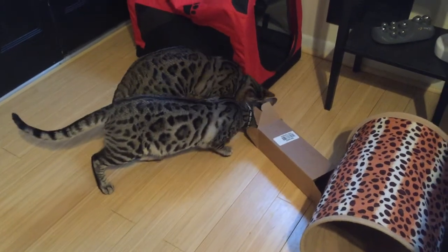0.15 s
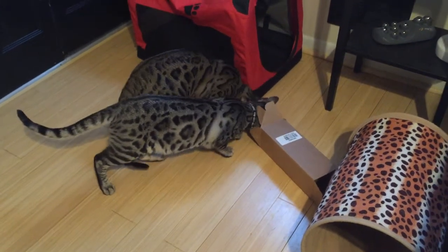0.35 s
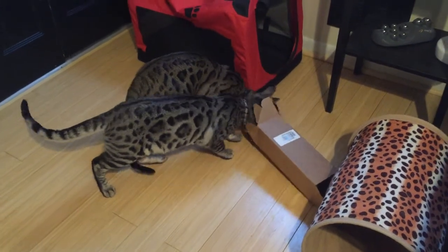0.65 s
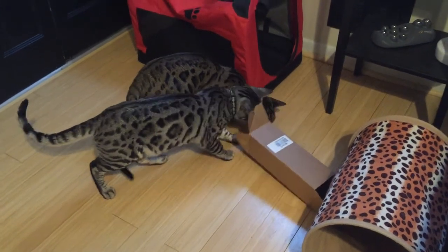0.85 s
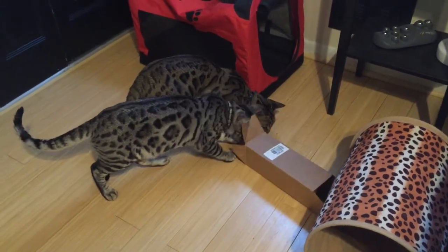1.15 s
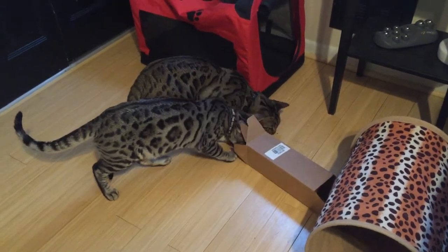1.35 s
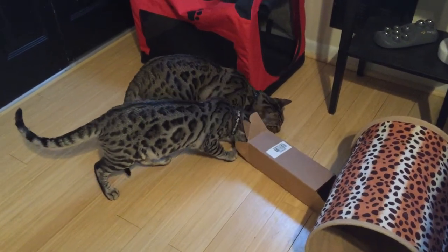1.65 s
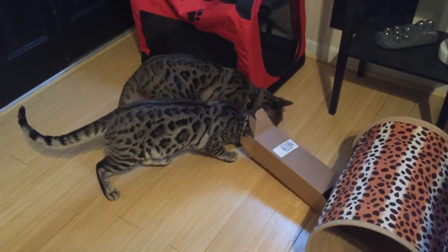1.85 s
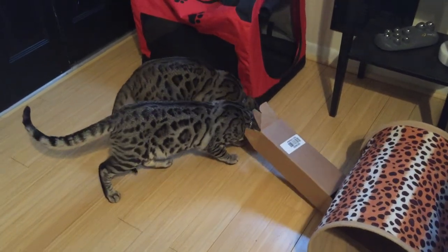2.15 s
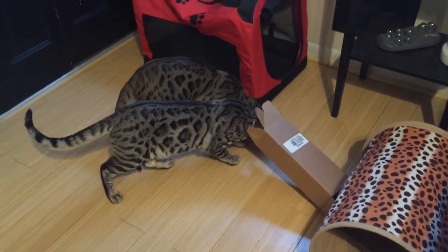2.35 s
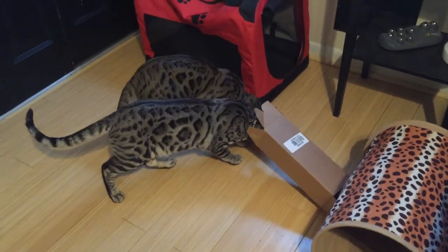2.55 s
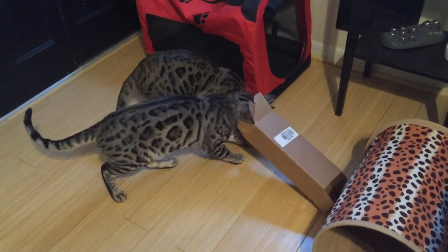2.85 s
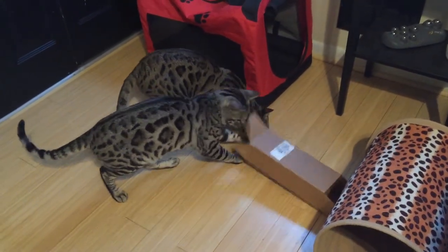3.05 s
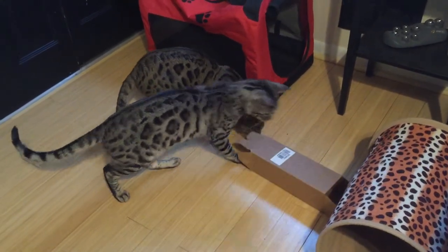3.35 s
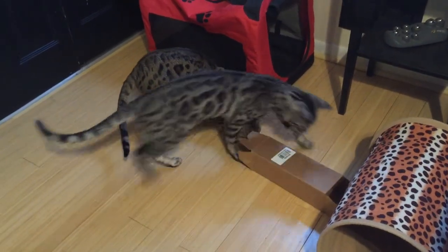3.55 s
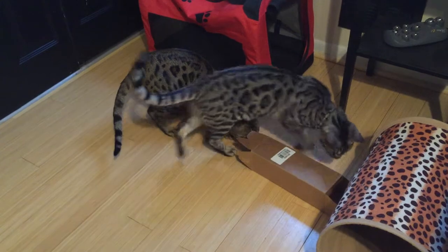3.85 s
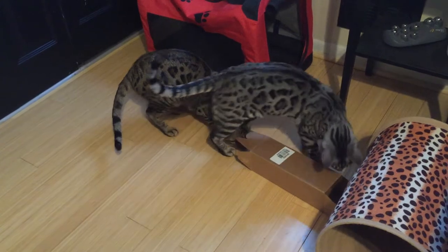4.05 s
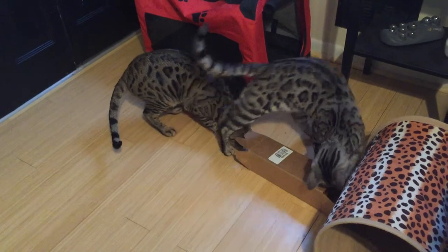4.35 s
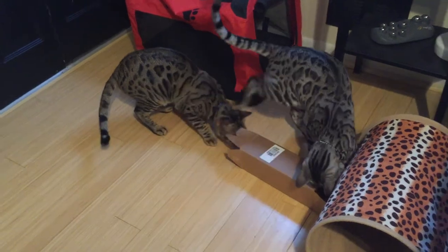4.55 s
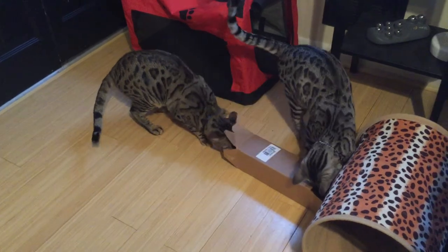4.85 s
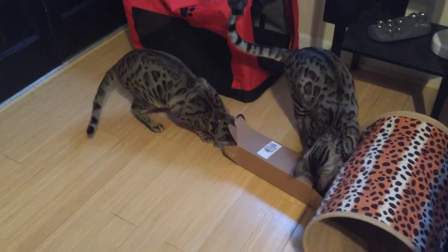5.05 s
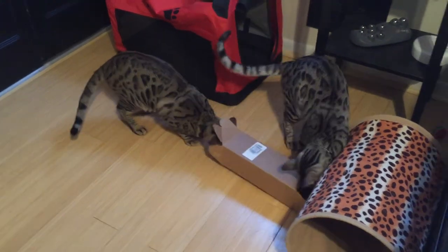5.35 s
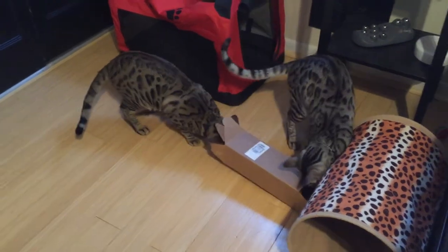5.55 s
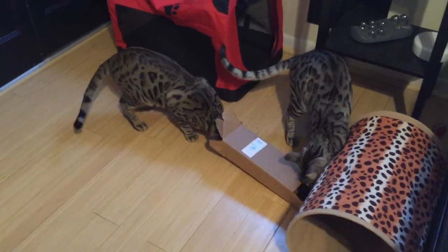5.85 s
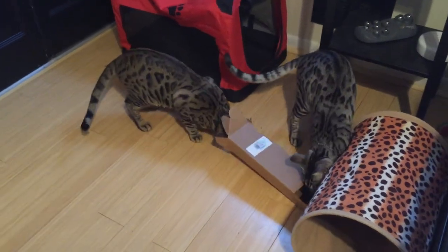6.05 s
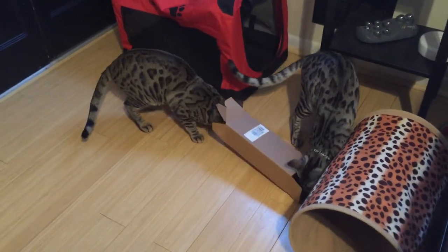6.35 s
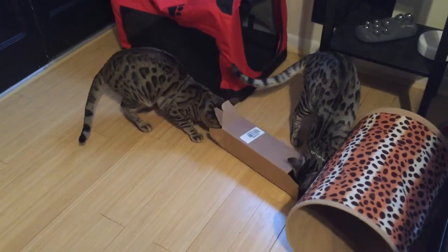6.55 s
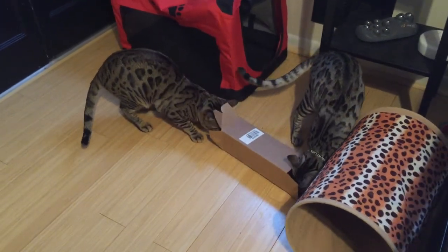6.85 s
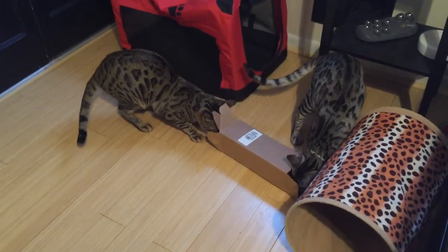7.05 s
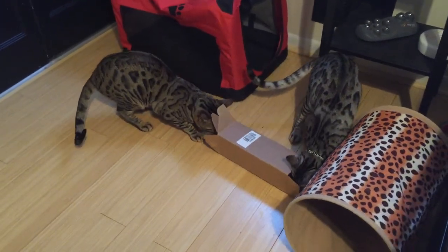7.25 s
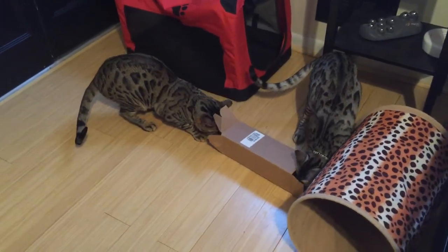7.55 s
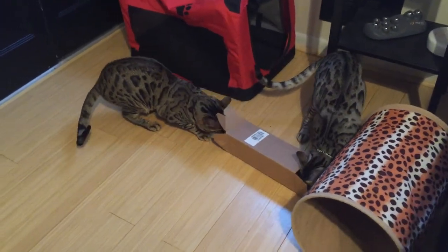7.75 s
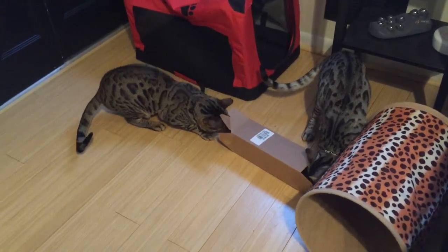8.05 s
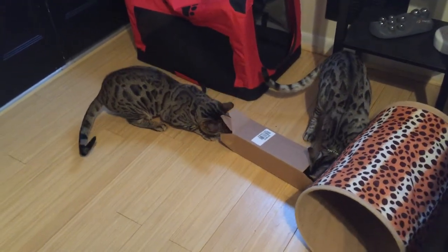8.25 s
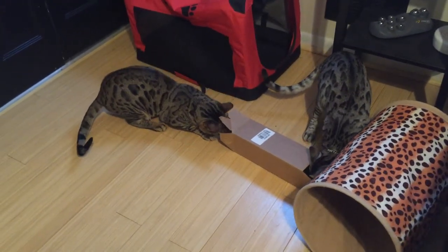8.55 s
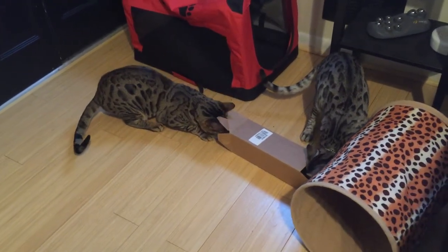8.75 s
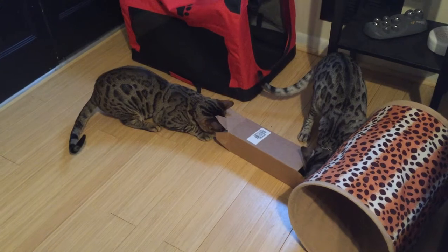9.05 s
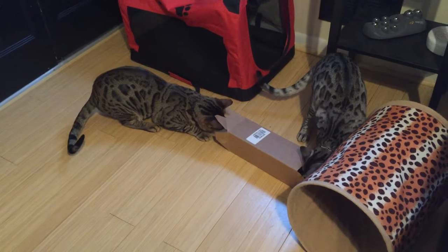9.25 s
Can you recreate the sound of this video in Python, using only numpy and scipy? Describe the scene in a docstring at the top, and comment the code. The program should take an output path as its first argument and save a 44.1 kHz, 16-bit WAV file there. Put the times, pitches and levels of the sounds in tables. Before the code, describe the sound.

In a quiet small room, a light cardboard box is pushed juddering over boards, slaps down hard, then gets knocked, scraped and crunched by paws.

```python
"""Fur brushes card and rustles faintly at first, over a faint hum and hiss, then a paw taps: two cats
paw and nose a small cardboard box on the wooden floor of a small room, which rings briefly after them.
The pushed edge judders over the boards, then the box drops flat with a sharp knock; later it scrapes
and crunches. Blows excite damped panel modes, rubs are grains of friction noise, squeaks are wavering
tones, steps are dying low tones, and the microphone channel passes nothing above its band limit."""
import sys
import numpy as np
from scipy import signal
from scipy.fft import rfft, irfft, next_fast_len
from scipy.io import wavfile
from scipy.ndimage import map_coordinates

SR = 44100
rng = np.random.default_rng(int(sys.argv[2]) if len(sys.argv) > 2 else 0)


def store_pcm(level_fs):
    """Save levels as 16-bit WAV."""
    pcm = np.round(np.clip(level_fs, -1, 1) * 32767).astype(np.int16)
    wavfile.write(sys.argv[1], SR, np.atleast_2d(pcm).T)


N = 414099
LENGTH = 32768  # samples in one blow or response
T = np.arange(LENGTH) / SR
HZ = np.fft.rfftfreq(LENGTH, 1 / SR)

# Every touch is described in four ranges: thud, knock, tap and tick. Knock sets the touch's level;
# thud, tap and tick are offsets from an ordinary touch of its kind.
# the four ranges, the lowest left open downwards: (low f/Hz, high f/Hz)
RANGES = [(110, 450), (450, 1500), (1500, 3200), (3200, 17000)]

# fur and flaps rub on the card, with a soft tap at 8.231 s:
# (start t/s, length t/s, knock level/dB, thud/dB, brightness/dB)
BRUSHES = [(0.018, 0.064, -75, 7, 3), (0.14, 0.43, -84, 6.5, 7), (0.65, 0.035, -75, 8.5, 0),
           (0.693, 0.12, -56, 4, -10.5), (1.892, 0.029, -53.5, -15, -6.5), (2.127, 0.44, -79, -12, 10.5),
           (2.316, 0.0097, -75.5, -11, 18), (2.692, 0.33, -75.5, -7, 17.5), (3.174, 0.14, -59, 9, 12),
           (3.45, 0.012, -61, -16, -5), (4.56, 0.18, -67.5, -14, 1.5), (5.956, 0.084, -66, 1, 4.5),
           (8.231, 0.0091, -64.5, -4, -19), (9.063, 0.018, -67, -13, -2.5)]
# a loose flap scuffs the box with a thin rasp: (start t/s, length t/s, knock level/dB)
SCUFFS = [(4.693, .012, -72), (8.749, 0.0065, -69.5), (9.217, 0.0064, -59), (9.38, .03, -73)]
# a faint thin rustle, as of fur on fabric: (start t/s, length t/s, knock level/dB)
RUSTLES = [(0.02, 0.073, -72), (0.152, 0.14, -82), (0.339, 0.056, -76)]
# paws and teeth on the box: (t/s, knock level/dB, thud/dB, tap/dB, tick/dB, panel f/Hz, panel ring/dB)
PAW_KNOCKS = [(0.076, -69.5, 12, 6, 16, 1090.0, -5), (1.146, -67, 12, -5, -2.5, 253, 1),
              (1.201, -46, 1, -7.5, -5.5, 810, -9), (1.222, -47, 2, -7, -5.5, 1350, -3),
              (2.09, -72.5, -5, 8.5, 19, 1530, -15), (3.214, -43.5, 3, -15, -8, 280, 4),
              (3.315, -39.5, 2, 1, -1.5, 953, -4), (3.331, -38.5, -15, -3, 0, 944, -0.5),
              (3.448, -53.5, -10, -5.5, -10.0, 1112, -3), (3.527, -68.5, -13.5, -6, -15, 1004, -1.5),
              (3.739, -44, -1.0, -10, -9, 571, -2.5), (4.539, -59.5, 7, -11, -22.5, 449, -0.5),
              (4.553, -57.5, 6, -4.5, -4, 235.0, 4), (4.586, -70, 7.5, -1.0, -5.0, 260.0, 1),
              (4.692, -63.5, 4, -2.0, 2, 1146, -9), (4.768, -64, -9.5, 7.5, 10.5, 1170, -5),
              (5.817, -75.5, 4.5, 13.5, 25.5, 2100.0, -10), (5.835, -47.5, -8.5, -12, -5, 1090, -6),
              (5.995, -50.5, -1.5, -2.5, -1, 887, 7), (6.031, -57.5, -8, 5.5, 10, 2150, -11.0),
              (6.094, -48, -5.5, 6.5, 13, 960, 0.0), (6.109, -51.5, -11, 5.5, -9, 1650.0, -2),
              (6.158, -44.0, -3.5, 4, 8.5, 950, -8), (6.741, -60.5, -9.5, -5, -9.5, 820.0, -5.5),
              (7.012, -71, -12, -9.5, -10.5, 1112, -3), (7.122, -49, 4, -7.5, -10, 366, -7.5),
              (7.151, -53, -3, -7.5, -13, 295.0, 3.0), (7.177, -61, 10.5, -10, -16.5, 786, 2.0),
              (7.262, -62, 1, -9, -5, 638, -9), (7.352, -64.5, -2, -8.5, -5, 820, -7.5),
              (7.496, -50, 1.0, -5.5, -4.5, 559, -9), (7.592, -55.5, -6, -7, -2.5, 1124, 7),
              (7.621, -52.5, -15, -10.0, -3, 644, 2), (7.646, -46, -16.5, -5.5, -2, 1077, 5),
              (7.672, -47.5, -10.5, -3, -0.5, 1280, 0), (7.799, -58.5, -9, 2, 9, 1140, 8.0),
              (7.843, -37, -14, -4.5, -2, 1067, 4.5), (7.867, -44, -19, -21, -14, 843, -4),
              (7.883, -66.0, -14, 1, 16, 1220.0, -8.0), (7.972, -50.5, -8, -10, -9, 656, -6.0),
              (7.983, -46.5, -11, -7, -9.5, 906, -7), (8.033, -44.0, -6, 6, 13, 2513, 0),
              (8.147, -57.5, -16, -19, -27.0, 670, 3), (8.2, -59.5, -7, -13, -17, 650, -3),
              (8.327, -47, -2.5, -11, -10.5, 642, -4.5), (8.352, -72, 4.5, 12.5, 20.5, 230.0, -9),
              (8.409, -63, 6, -19, -16.0, 640, -8), (8.447, -56, -3, -17, 4.5, 1390, -12),
              (8.489, -58.5, -9, -9, 11, 1400.0, -8.0), (8.525, -63.0, -14, 12.5, 25, 1420, -1.0),
              (8.625, -66.5, -14, 18.5, 33.5, 2400.0, 7), (8.74, -51, -3.5, -0.5, -18, 2320, 4),
              (8.877, -60.5, -4.5, 1.5, -2.5, 2130, 5), (8.925, -64, 3, -10.5, -9.5, 621, 0.5),
              (9.058, -62.0, -11.5, -2, -6.5, 1300, 5.5), (9.173, -62.5, -9.5, 8, 13, 1970, -13),
              (9.203, -54.0, -13.5, 3.5, -1.5, 1384, 1.5)]
# soft steps on the boards: (t/s, level/dB, pitch f/Hz)
STEPS = [(1.991, -50, 54), (3.689, -50.5, 216), (3.811, -48, 65.3), (5.365, -44, 201.5),
         (5.553, -54.5, 212), (5.919, -46.5, 160), (7.51, -42, 141)]
# a claw tip clicks on the boards: (t/s, level/dB)
CLAW_CLICKS = [(2.302, -66.5), (2.316, -60), (2.942, -52), (5.314, -69.5), (5.393, -68), (5.459, -67),
               (5.77, -70), (6.0784, -52), (6.358, -60.5), (6.416, -60), (6.432, -57), (6.478, -60)]
# card slipping on card: (t/s, length t/s, level before the swell/dB, pitch f/Hz)
SQUEAKS = [(2.41, 0.05, -65, 690), (4.695, 0.016, -52, 1150), (6.092, 0.038, -40, 930),
           (6.14, 0.049, -47, 920), (6.465, 0.082, -62.5, 407), (7.585, 0.02, -52, 1163),
           (7.654, 0.047, -54, 1225), (7.747, 0.029, -60, 1085)]
# the pushed edge sticks and slips: (t/s, knock level/dB, tap/dB, tick/dB, panel f/Hz, panel ring/dB)
EDGE_SLIPS = [(2.459, -48, -18, -18, 820.0, -8), (2.485, -41, -6, -13, 1075.0, -18),
              (2.492, -42.5, -10, -7.5, 646.0, 1.0), (2.567, -39, -4.5, -1, 1100.0, -11),
              (2.581, -35, 1, 1.5, 650.0, -3), (2.655, -33, -7.5, -3, 651.0, -3.5),
              (2.7, -36, -4.5, -1, 1359.0, -1), (2.727, -42.0, -3, -5.0, 985.0, -5.5),
              (2.774, -35.5, -9, -9, 1120.0, -4.5), (2.785, -37.5, -14, -17.5, 639.0, 1.5),
              (2.811, -39, -2, 0.5, 1400.0, -4), (2.827, -41, -2.5, -6, 1310.0, -5.5),
              (2.848, -45, -3.5, -7.5, 1310.0, -2.5), (2.875, -42.5, 1, -3, 1110.0, -1.5),
              (2.885, -35.5, 1.5, -1.5, 1348.0, 3.5), (2.911, -46, -2.0, -7, 1379.0, -3.5),
              (2.934, -38, -2.0, -1, 1386.0, -3), (2.949, -32.0, 0.5, 1, 1100.0, -3.0),
              (2.959, -37, 1, -2.5, 1360.0, 0.0), (3.01, -37.5, -1, -4.5, 1355.0, -3.5),
              (3.035, -38, -5.5, -13, 994.0, -5), (3.081, -32.5, 1.5, 5.5, 1360.0, -10.5),
              (3.106, -42, 1.5, 3.5, 580.0, -3.5), (3.116, -40.5, -1, -2, 1096.0, 3),
              (3.152, -37.5, -3.5, -1.5, 740.0, -6.5), (3.179, -43, -9.5, -6.5, 1095.0, -4.0)]
# the edge grinds over the floor: (start t/s, length t/s, knock level/dB)
EDGE_GRIND = [(2.487, .71, -51)]
# the lifted box falls flat: (t/s, knock level/dB, thud/dB, tap/dB, tick/dB, panel f/Hz, panel ring/dB)
FALL = [(3.2272, -19.5, -5, -4.5, -3, 965.6, -4)]
# the box slides along the floor, or crunches briefly (the short middle curve);
# one curve per scrape or crunch: (t/s, knock level/dB, thud/dB, brightness/dB)
SCRAPE_CURVES = [
    [(6.16, -72, -10, -0.5), (6.2, -51.5, -7, -1), (6.26, -48.5, -0.5, -3), (6.32, -50.5, -10, -1),
     (6.35, -51.5, -16, 3.5), (6.385, -56.5, -7, 9), (6.44, -61, -9, 16), (6.49, -63, -11, 17.5),
     (6.56, -69.5, -6.5, 13), (6.72, -81, -5.5, 2)],
    [(8.034, -54, 1, 1), (8.045, -46.5, -1, 10), (8.06, -48.5, -6, 18.5), (8.08, -54, -13, 11),
     (8.12, -67, -17, 12), (8.2, -84, -11, 14)],
    [(8.39, -79, 3, 16), (8.45, -72, -9, 10), (8.505, -60, 4, 12), (8.535, -52.5, -10, 10),
     (8.6, -50.5, -16, 12.5), (8.65, -52.5, -4, 11), (8.7, -60, 3, -1), (8.8, -67, -17, -11)],
]

# balance of an ordinary touch of each kind: (thud/dB, knock/dB, tap/dB, tick/dB)
CARD_BALANCE = [0, 0, 1, -10]
EDGE_BALANCE = [-15.5, -2, -5.5, -20]
CLAW_BALANCE = [-26, -8.5, -25.5, 0.5]
SCUFF_BALANCE = [-20.5, -19, 9.5, -9]
RUSTLE_BALANCE = [-10, 3, 5.5, 2]
SCRAPE_BALANCE = [-2.5, 2, -1, -9.5]
# how fast a finished stroke dies in each range: t60/s of thud, knock, tap and tick
STROKE_RELEASE_T60 = [0.24, 0.32, 0.2, .27]

# modes of the struck box: (f/Hz, level/dB, t60/s)
BOX_MODES = [(219.6, -1, 0.15), (274, -5, 0.33), (393, 0, 0.23), (434, -1.5, 0.14), (668, -11, 0.46),
             (750, -19.5, 0.073), (902, 6, 0.035), (972, 3, 0.094), (1114, 5.5, 0.056), (1244, -2, 0.28),
             (1352, -0.5, 0.17), (1530, -17, 0.071), (1700, -11.5, 0.17), (2035, 0, 0.15), (2187, 0, 0.16),
             (2470, 3, 0.17)]
# modes of the box tilted on its edge: (f/Hz, level/dB, t60/s)
EDGE_MODES = [(382.2, -4, 0.43), (577, -2, 0.13), (653.6, 1.5, 0.16), (742, -3.5, .18), (980, -1.5, .15),
              (1115, 0, 0.3), (1274, -6, 0.084), (1362, 0.5, 0.095), (1436, -1, .16), (1650, -3, .18),
              (2410, -2, 0.13), (2461, -1.5, 0.22)]
# resonances of the rustle: (f/Hz, level/dB, t60/s)
FABRIC_MODES = [(2750, -2, 0.038), (3357, 6, 0.037)]

# colour of the card under paws: (f/Hz, level per Hz/dB)
CARD_COLOUR = [(30, -38.5), (110, -18), (210, -2), (410, -9.5), (500, -6), (640, 2.5), (1050, -5),
               (2300, -1.5), (3200, -9), (4800, -16.5), (7000, -21), (10300, -33), (12500, -29.5),
               (15000, -31)]
# colour of the flat fall: (f/Hz, level per Hz/dB)
SLAP_COLOUR = [(30, -33.5), (80, -27.5), (120, -15), (160, -4.5), (215, -2), (310, 5.5), (410, -2),
               (520, -9.5), (680, 1.5), (1000, -2), (1350, -2.5), (1650, -11), (2100, -4), (2700, -13.5),
               (3200, -21.5), (4800, -26.5), (6500, -30.5), (10000, -35.5), (13000, -41), (15000, -52.5)]
# colour of the dragged edge: (f/Hz, level per Hz/dB)
DRAG_COLOUR = [(40, -44.5), (150, -25.5), (230, -8.5), (320, -15), (380, -6), (510, -15), (650, -1),
               (800, -5), (1080, -4.5), (1210, -4.5), (1380, -3.5), (1510, -16), (1630, -9.5), (1780, -9.5),
               (2500, -12.5), (3300, -19), (4400, -26), (5200, -37), (9000, -53), (15000, -57)]
# colour of a rubbed box, its hollow strong between 200 and 300 Hz: (f/Hz, level per Hz/dB)
RUB_COLOUR = [(50, -36.5), (160, -17.5), (215, 8.5), (285, 1), (350, -1.5), (500, -7.5), (800, 1),
              (1050, -3.5), (1450, -4.5), (1950, -5.5), (2450, -4), (3400, -12.5), (5000, -13.5),
              (15000, -18.5)]
# colour of the rustle: (f/Hz, level per Hz/dB)
FABRIC_COLOUR = [(100, -22), (1300, -13), (2100, -14), (2740, 6), (3340, -10), (4200, -16), (15000, -26)]
# colour of a claw's click: (f/Hz, level per Hz/dB)
CLAW_COLOUR = [(100, -28.5), (2000, -6), (3800, -2.5), (5600, -1.5), (8000, -10), (15000, -15.5)]
# colour of a scraping or crunching box: (f/Hz, level per Hz/dB)
SCRAPE_COLOUR = [(50, -33), (220, -9.5), (400, -7.5), (500, -11), (700, 0.5), (1300, -6), (2300, 0),
                 (3200, -10.5), (4800, -13), (6500, -14.5), (10300, -21.5), (12500, -19), (15000, -21)]
# colour of the room's hiss and rumble: (f/Hz, level per Hz/dB)
QUIET_COLOUR = [(15, -51), (25, -23.5), (43, -14.5), (101, -7.5), (132, -12), (173, -11), (233, -13.5),
                (330, -15.5), (456, -19), (535, -21.5), (868, -24), (941, -23.5), (1370, -24),
                (3910, -27.5), (15400, -36)]
# lines of the hum: (f/Hz, rms level/dB)
HUM_LINES = [(59.5, -76), (99, -77)]
# decay of the small room: (f/Hz, t60/s)
ROOM_DECAY = [(100, 0.33), (250, 0.23), (700, 0.36), (2200, 0.36), (5000, 0.27), (14000, 0.2)]

CARD_GIVE = 0.001  # s for a panel to take up a blow, before softness scales it
PANEL_DB, PANEL_T60 = -11, 0.048  # ordinary level (dB) and t60 (s) of the touched panel's ring
CLAW_HZ, CLAW_RING_DB = 5570, -12.5  # the thin ring after a claw's click
CRACK_FADES = 0.5  # dB of crack lost per dB of dullness
DETUNE = 0.007  # random share by which modes shift as the box is bent and held
TAP_SHARE = 0.57  # a brighter rub lifts the tick by its brightness, and the tap by this share of it
STROKE_ATTACK_S = 0.03  # a stroke swells, holds, then dies in the room
PRESSURE_HZ, PRESSURE_DB = 48.7, 2  # rate and spread of the wavering pressure of a rub
# the cat leans in harder from start to end of the push
PUSH_SWELL_DB, PUSH_BRIGHTENS_DB = 6, 7
SQUEAK_WAVER, SQUEAK_WAVER_HZ = 0.035, 150  # share by which the pitch wavers, and its rate
TOP_HZ = 15550  # band limit of the microphone channel


def amp(db):
    """Decibels to gain."""
    return np.exp(np.asarray(db) * (np.log(10) / 20))


def unit(x):
    """Scaled to rms 1."""
    return x / np.sqrt(np.mean(x ** 2) + 1e-20)


def norm(x):
    """Scaled to energy 1."""
    return x / np.sqrt(np.sum(x ** 2) + 1e-20)


def along(points, hz):
    """Interpolate (f/Hz, value) points on a log axis."""
    f, v = np.transpose(points)
    return np.interp(np.log(hz + 1), np.log(f + 1), v)


def filtered(x, response):
    """x times a response of frequency."""
    m = next_fast_len(len(x) + LENGTH)
    return irfft(rfft(x, m) * response(np.fft.rfftfreq(m, 1 / SR)), m)[:len(x)]


def causal(points):
    """Minimum-phase response with the given colour, by folding its cepstrum."""
    cepstrum = irfft(np.log(amp(along(points, HZ))))
    cepstrum[1:LENGTH // 2] *= 2
    cepstrum[LENGTH // 2 + 1:] = 0
    return np.exp(rfft(cepstrum))


def band(lo, hi):
    """Causal band-pass response; the lowest band is open downwards."""
    if lo <= RANGES[0][0]:
        sos = signal.butter(3, hi, fs=SR, output="sos")
    else:
        sos = signal.butter(3, [lo, hi], "band", fs=SR, output="sos")
    return signal.sosfreqz(sos, HZ, fs=SR)[1]


def coloured_ranges(colour):
    """Responses of the four ranges under one colour."""
    return causal(colour) * np.array([band(lo, hi) for lo, hi in RANGES])


def room():
    """A fresh diffuse tail of energy 1 that builds up after the first walls."""
    hz, t, z = signal.stft(rng.standard_normal(LENGTH), SR, nperseg=256)
    decay = amp(-60 * t / along(ROOM_DECAY, hz)[:, None])
    tail = signal.istft(z * decay, SR, nperseg=256)[1][:LENGTH]
    return norm(tail * (1 - np.exp(-(T / 0.0013) ** 2)))


def ring(modes, scatter_db):
    """Damped modes at new strengths and phases; each mode's dB sets its energy."""
    hz, db, t60 = np.transpose(modes)[:, :, None]
    hz = hz * (1 + DETUNE * rng.standard_normal(hz.shape))
    t = T[:LENGTH // 2]
    size = amp(db + scatter_db * rng.standard_normal(db.shape)) / np.sqrt(t60)
    phase = rng.uniform(0, 2 * np.pi, db.shape)
    waves = size * np.exp(-np.log(1000) * t / t60) * np.sin(2 * np.pi * hz * t + phase)
    return norm(np.pad(waves.sum(0), (0, LENGTH - len(t))))


def burst(t60):
    """Dying noise of energy 1."""
    t = T[T < 2 * t60]
    noise = rng.standard_normal(len(t)) * np.exp(-np.log(1000) * t / t60)
    return np.pad(norm(noise), (0, LENGTH - len(t)))


def wobble(count, rate):
    """A smooth random curve of count samples, rate knots a second."""
    return map_coordinates(rng.standard_normal(512), [np.arange(count) * rate / SR], mode="wrap")


def contact(balance, db, thud_db=0, tap_db=0, tick_db=0):
    """Range levels: weight behind a contact adds thud, a stiff panel tap, a hard point tick."""
    return db + np.add(balance, [thud_db, 0, tap_db, tick_db])


def friction(balance, db, thud_db, bright_db):
    """Range levels for a rub: a drier, lighter one is brighter."""
    return contact(balance, db, thud_db, TAP_SHARE * bright_db, bright_db)


def grains(count, rate, spread_db, smooth):
    """Friction force: fibres catch and let go at random, over a smooth hiss, under wavering pressure."""
    catches = rng.random(count) < rate / SR
    sizes = amp(spread_db * np.minimum(rng.exponential(size=count), 2))
    signs = rng.choice([-1, 1], count)
    force = unit(catches * sizes * signs) + smooth * rng.standard_normal(count)
    return force * amp(PRESSURE_DB * wobble(count, PRESSURE_HZ))


def rubbing(strokes, modes, colour, grain_rate, spread_db, smooth, ring_db, room_db,
            swell_db=0, brighten_db=0):
    """Dense grains of friction force drive the modes and the room."""
    out = np.zeros(N)
    ranges = coloured_ranges(colour)
    growths = friction(0, swell_db, 0, brighten_db)
    for s, length, levels in strokes:
        count = LENGTH if length < 0.5 else 2 * LENGTH
        t = np.arange(count) / SR - STROKE_ATTACK_S
        force = grains(count, grain_rate, spread_db, smooth)
        body = 1 + rfft(amp(ring_db) * ring(modes, scatter_db=7.0) + amp(room_db) * room())
        envelope = np.minimum(1 + t / STROKE_ATTACK_S, 1) ** 2
        after = np.maximum(t - length, 0)
        progress = np.clip(t / length, 0, 1) - 0.5
        sound = np.zeros(count)
        for part, db, growth, t60 in zip(irfft(body * ranges), levels, growths, STROKE_RELEASE_T60):
            driven = unit(signal.fftconvolve(force, part)[:count])
            sound += driven * amp(db + growth * progress - 60 * after / t60)
        # the swell leads up to the start time
        at = round((s - STROKE_ATTACK_S) * SR) + np.arange(count)
        inside = (at >= 0) & (at < N)
        out[at[inside]] += (envelope * sound)[inside]
    return out


def blows(rows, modes, colour, ring_db, crack_db, rattle_db, room_db, walls_db, shiver_t60):
    """A contact cracks; the box gives, shivers and rings, loose flaps rattle, the room answers."""
    out = np.zeros(N + LENGTH)
    ranges = coloured_ranges(colour)
    treble = (1 - 1j * 3500 / (HZ + 1)) ** -2  # the crack is treble only
    head = SR // 40  # levels hold over the first 25 ms
    for s, levels, panel_hz, panel_db in rows:
        # a dull contact is a soft one, and builds up more slowly
        dullness_db = max(levels[:2]) - levels[3]
        give = CARD_GIVE * np.clip(amp(dullness_db - 19), 0.3, 2.5)
        touched = amp(PANEL_DB + panel_db) * ring([(panel_hz, 0, PANEL_T60)], scatter_db=0)
        panels = burst(shiver_t60) + touched + amp(ring_db) * ring(modes, scatter_db=2.0)
        panels *= 1 - np.exp(-(T / give) ** 2)
        rattle = np.zeros(LENGTH)
        for delay in rng.uniform(0.017, 0.11, size=3):
            rattle += amp(rattle_db - 170 * delay) * np.roll(burst(0.011), round(delay * SR))
        crack_gain = amp(crack_db - CRACK_FADES * max(dullness_db - 15, 0))
        blow = rfft(panels + rattle) + crack_gain * treble * rfft(burst(0.0033))
        # the walls return the blow's own ring, over a diffuse wash
        blow += rfft(room()) * (amp(walls_db) * blow + amp(room_db))
        parts = irfft(blow * ranges)
        parts /= np.sqrt(np.mean(parts[:, :head] ** 2, axis=1, keepdims=True))
        out[round(s * SR):][:LENGTH] += amp(levels) @ parts
    return out[:N]


def background():
    """Coloured noise for hiss and rumble; narrow noise lines for a household appliance's low hum."""
    air = unit(filtered(rng.standard_normal(N), lambda f: amp(along(QUIET_COLOUR, f))))
    out = amp(-70.5) * air
    for hz, db in HUM_LINES:
        line = filtered(rng.standard_normal(N), lambda f: 1 / (1 + ((f - hz) / 2) ** 2))
        out += amp(db) * unit(line)
    return out


def brushing():
    """Fur and flaps rub and scuff the box, with one soft tap: grains drive the hollow card."""
    strokes = [(s, length, friction(CARD_BALANCE, *touch)) for s, length, *touch in BRUSHES]
    scuffs = [(s, length, contact(SCUFF_BALANCE, db)) for s, length, db in SCUFFS]
    return rubbing(strokes + scuffs, BOX_MODES, RUB_COLOUR, grain_rate=410, spread_db=-1, smooth=0.14,
                   ring_db=-12.0, room_db=2.5)


def rustling():
    """A faint thin rustle: sparser grains driving two high resonances."""
    rustles = [(s, length, contact(RUSTLE_BALANCE, db)) for s, length, db in RUSTLES]
    return rubbing(rustles, FABRIC_MODES, FABRIC_COLOUR, grain_rate=230, spread_db=0.5, smooth=0.14,
                   ring_db=-8, room_db=2)


def pawing():
    """Paws and teeth knock on the box, each touched panel ringing at its own note."""
    knocks = [(s, contact(CARD_BALANCE, *touch), hz, panel_db)
              for s, *touch, hz, panel_db in PAW_KNOCKS]
    return blows(knocks, BOX_MODES, CARD_COLOUR, ring_db=-10.0, crack_db=1.0, rattle_db=-11.5,
                 room_db=-6.0, walls_db=-4.0, shiver_t60=0.041)


def stepping(t60, rise):
    """A padded paw bends a floorboard, which booms softly as a dying tone."""
    out = np.zeros(N + LENGTH)
    for s, db, hz in STEPS:
        envelope = amp(db - 0.5 - 60 * T / t60) * (1 - np.exp(-T / rise))
        out[round(s * SR):][:LENGTH] += envelope * np.sin(2 * np.pi * hz * T)
    return out[:N]


def clicking():
    """Claw tips click on the boards: a strong treble crack with a thin, high ring."""
    clicks = [(s, contact(CLAW_BALANCE, db), CLAW_HZ, CLAW_RING_DB) for s, db in CLAW_CLICKS]
    return blows(clicks, BOX_MODES, CLAW_COLOUR, ring_db=-22.0, crack_db=8.0, rattle_db=-34.5,
                 room_db=-14.0, walls_db=-1, shiver_t60=0.0047)


def squeaking():
    """Card slips on card: a short, rough tone of wavering pitch that swells and stops."""
    out, t = np.zeros(N), T[:LENGTH // 8]
    for s, length, db, hz in SQUEAKS:
        pitch = hz * (1 + SQUEAK_WAVER * wobble(len(t), SQUEAK_WAVER_HZ))
        pressure = amp(PRESSURE_DB * wobble(len(t), SQUEAK_WAVER_HZ))
        tone = unit(np.sin(2 * np.pi * np.cumsum(pitch) / SR) * pressure)
        swell = np.sin(np.pi * np.minimum(t / length, 1))
        out[round(s * SR):][:len(t)] += amp(db) * tone * swell
    return out


def pushing():
    """The tilted box grinds along on its edge, ever harder, and judders in separate slips."""
    slips = [(s, contact(EDGE_BALANCE, db, 0, tap_db, tick_db), hz, panel_db)
             for s, db, tap_db, tick_db, hz, panel_db in EDGE_SLIPS]
    grind = [(s, length, contact(EDGE_BALANCE, db)) for s, length, db in EDGE_GRIND]
    judder = blows(slips, EDGE_MODES, DRAG_COLOUR, ring_db=-13.0, crack_db=-6.5, rattle_db=-15.0,
                   room_db=-13.0, walls_db=-7.5, shiver_t60=0.072)
    return judder + rubbing(grind, EDGE_MODES, DRAG_COLOUR, grain_rate=490, spread_db=-4.0, smooth=0.37,
                            ring_db=-13.5, room_db=9.5,
                            swell_db=PUSH_SWELL_DB, brighten_db=PUSH_BRIGHTENS_DB)


def falling():
    """The box slaps flat on the boards: a hard crack and a long shiver of the panels."""
    slap = [(s, contact(CARD_BALANCE, *touch), hz, panel_db) for s, *touch, hz, panel_db in FALL]
    return blows(slap, BOX_MODES, SLAP_COLOUR, ring_db=-13.5, crack_db=8.0, rattle_db=-16.0,
                 room_db=-6.5, walls_db=-14.0, shiver_t60=0.15)


def scraping(ring_db, room_db):
    """The box scrapes over the boards or crunches: grains whose level and brightness follow curves."""
    out = np.zeros(N + LENGTH)
    ranges = coloured_ranges(SCRAPE_COLOUR)
    for curve in SCRAPE_CURVES:
        times = np.array([row[0] for row in curve])
        levels = np.array([friction(SCRAPE_BALANCE, *touch) for s, *touch in curve])
        body = 1 + rfft(amp(ring_db) * ring(BOX_MODES, scatter_db=-5.5) + amp(room_db) * room())
        force = grains(LENGTH, rate=420, spread_db=3.5, smooth=0.38)
        parts = irfft(rfft(force) * body * ranges)
        for part, db in zip(parts, levels.T):
            gain = amp(np.interp(times[0] + T, times, db, right=-np.inf))
            out[round(times[0] * SR):][:LENGTH] += unit(part) * gain
    return out[:N]


def scene():
    """Every touch of the cats and the box, over the quiet of the room, in one channel."""
    mix = background() + brushing() + rustling() + pawing()
    mix += stepping(t60=0.12, rise=0.0062) + clicking() + squeaking()
    mix += pushing() + falling() + scraping(ring_db=-5.5, room_db=5.5)
    return mix[None]


def record(dry):
    """The microphone channel passes nothing above its band limit."""
    return filtered(dry[0], lambda hz: hz < TOP_HZ)[None]


dry = scene()
out = record(dry)
store_pcm(out)
```